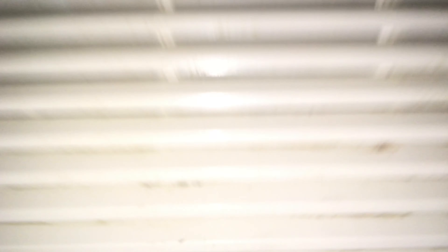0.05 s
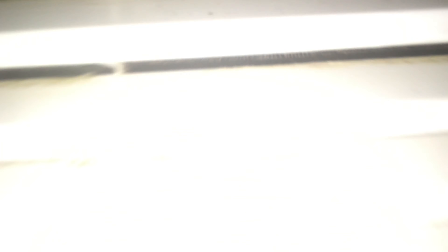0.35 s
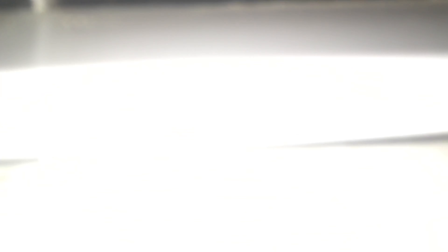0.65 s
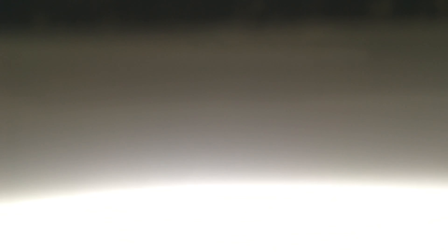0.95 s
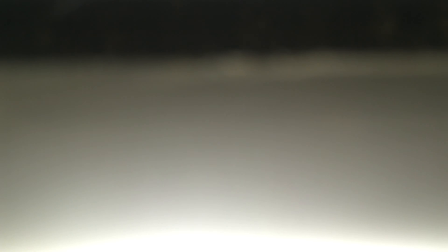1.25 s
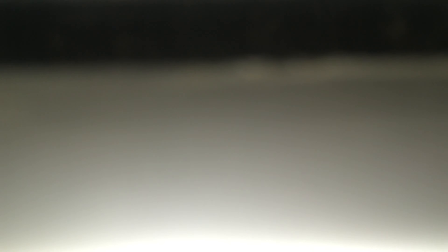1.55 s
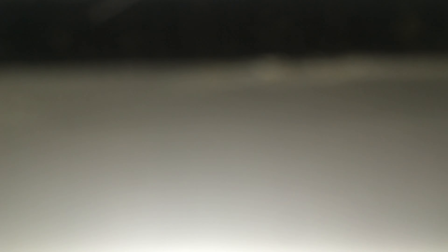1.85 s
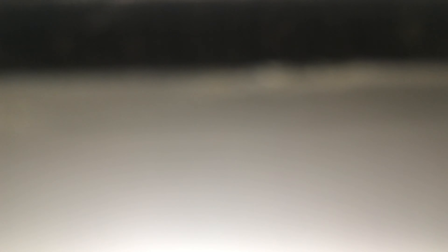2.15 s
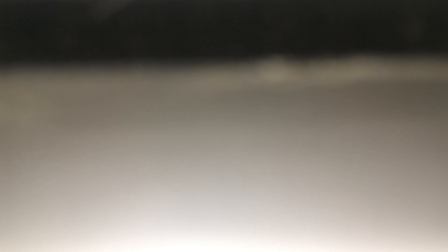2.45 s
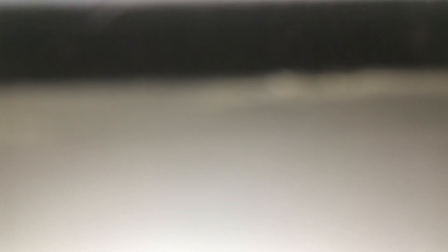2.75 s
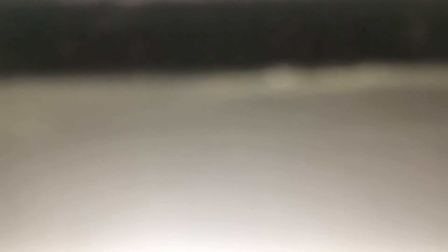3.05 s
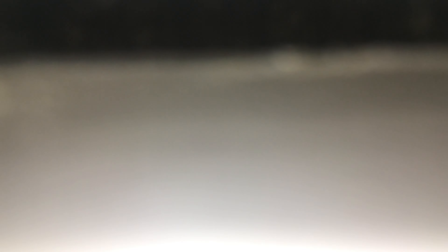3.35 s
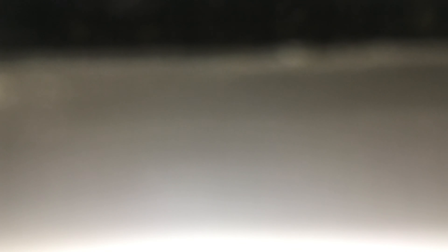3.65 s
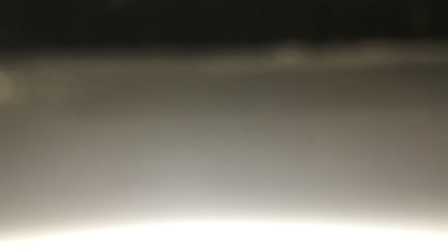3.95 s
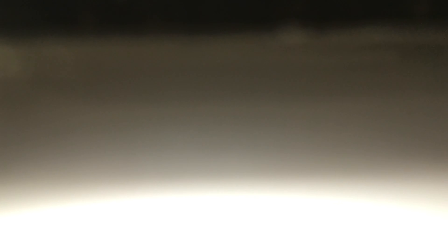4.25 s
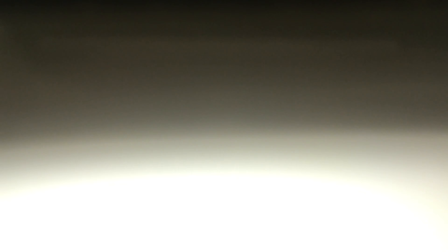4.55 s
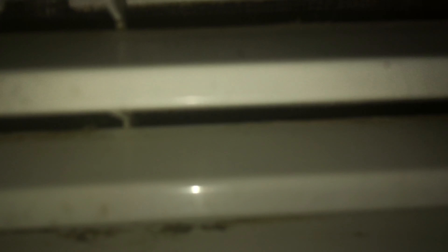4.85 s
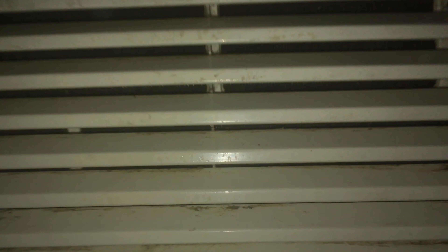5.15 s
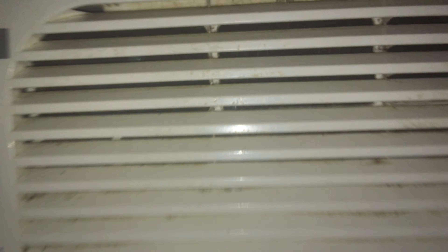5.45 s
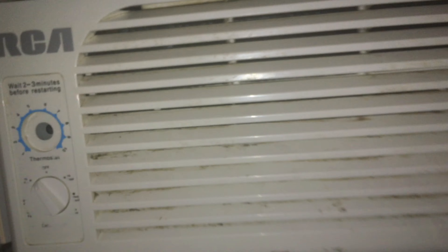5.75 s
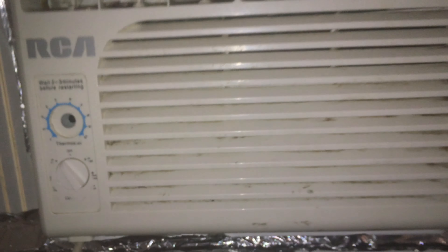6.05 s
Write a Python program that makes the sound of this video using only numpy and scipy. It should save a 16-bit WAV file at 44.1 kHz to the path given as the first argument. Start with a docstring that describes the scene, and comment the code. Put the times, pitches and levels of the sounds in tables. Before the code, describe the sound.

A window air conditioner rushes and hums while its air stream buffets the microphone with a gusting rumble, soft thumps and dull pops.

```python
"""A window air conditioner runs in a room: its compressor buzzes under the rush of the blower.
The microphone starts beside the vent, catches one gust, and after a second moves into the air stream.
There eddies buffet its port with a lumpy rumble, soft thumps and dull pops.
Near the end it backs away, crosses the edge of the jet once more and leaves it."""
import sys
import numpy as np
from scipy import signal
from scipy.fft import rfft, irfft
from scipy.io import wavfile
from scipy.ndimage import uniform_filter1d

SR = 44100
rng = np.random.default_rng(int(sys.argv[2]) if len(sys.argv) > 2 else 0)


def dump(signal):
    """Clip the signal to [-1, 1] and save it as 16-bit WAV at the path in sys.argv[1]."""
    limited = np.clip(np.atleast_2d(signal).T, -1, 1)
    pcm = np.round(limited * 32767).astype(np.int16)
    wavfile.write(sys.argv[1], SR, pcm)


N = 268569


def from_db(db):
    """Decibels to gain."""
    return 10 ** (np.asarray(db) / 20)


def unit_rms(x):
    """Scale to an rms of 1."""
    return x / np.sqrt(np.mean(x ** 2) + 1e-20)


def automation(rows):
    """Breakpoints to one curve for each column after the time."""
    times, *columns = np.transpose(rows)
    return [np.interp(np.arange(N) / SR, times, column) for column in columns]


def drift(rate_hz):
    """Smooth random wandering with an rms of 1."""
    hz = np.arange(N // 2 + 1) * SR / N
    return unit_rms(irfft(rfft(rng.standard_normal(N)) / (1 + (hz / rate_hz) ** 2), N))


def equalise(x, eq):
    """Shape x with an EQ curve that falls 21 dB an octave past both ends; rms 1."""
    hz, db = np.transpose(eq)
    octave, points = np.log2(np.arange(1, N // 2 + 2) * SR / N), np.log2(hz)
    outside = np.abs(octave - np.clip(octave, points[0], points[-1]))
    gain = from_db(np.interp(octave, points, db) - 21 * outside)
    return unit_rms(irfft(rfft(x) * gain, N))


# The microphone's move past the vent: time_s, front_share (0-1), cabinet_echo_ms
MIC_PATH = [(0, 0, 0.83), (.35, 0.07, 0.77), (.84, 0.06, 0.65), (.97, 0.94, 0.71), (4.68, 1, 0.74),
            (4.82, 0.13, .7), (5.4, 0, 0.82), (6.09, 0, 1.4)]


def in_front():
    """Where the microphone is: 0 beside the vent, 1 in front of it."""
    return np.clip(automation(MIC_PATH)[0], 0, 1)


def harmonics(turns, partials, waver_db):
    """Sines on multiples of the shaft rate, each wavering in level on its own."""
    return sum(from_db(db + waver_db * drift(1.6)) * np.sin(2 * np.pi * (round(k) * turns + rng.random()))
               for k, db in partials)


# The compressor's hum at the usual distance: shaft_multiple, level_db
HUM_TONES = [(1, -42), (2, -37.5), (4, -36), (12, -49), (17, -49), (18, -48), (19, -42.5), (24, -54),
             (32, -51.5), (34, -58)]
# Resonances of its shell, which colour the buzz: centre_hz, width_hz, level_db
SHELL_RESONANCES = [(2983, 219.3, -61), (4313, 57, -63), (5300, 150, -65.5), (6190, 600, -71),
                    (9300, 300, -76)]
SHAFT_HZ = 57.61


def compressor(turns, fader_db):
    """The strokes hum through the cabinet and buzz in the shell's resonances, louder close to the vent."""
    buzz = []
    for hz, width, db in SHELL_RESONANCES:
        for k in range(int((hz - width) / SHAFT_HZ), int((hz + width) / SHAFT_HZ) + 2):
            detune = 2 * (k * SHAFT_HZ - hz) / width
            buzz.append((k, db - 10 * np.log10(1 + detune ** 2)))
    nearness = from_db(fader_db - np.median(fader_db))
    return nearness * (harmonics(turns, HUM_TONES, waver_db=2.0) + harmonics(turns, buzz, waver_db=3.0))


# Fine, airy top from the lip of the vent: freq_hz, gain_db
SIZZLE_EQ = [(8500, -8), (9400, -5), (10400, -14), (11200, -1), (13000, 0), (14300, -7), (15600, -20)]


def lip_sizzle(fader_db, usual_db=-57, falloff=2.6):
    """Air tearing off the lip of the vent sizzles; it carries only a short way, and only to the side."""
    level_db = usual_db + falloff * (fader_db - np.median(fader_db))
    return from_db(level_db) * np.sqrt(1 - in_front()) * equalise(rng.standard_normal(N), SIZZLE_EQ)


# Fader ride on the blower as the microphone moves: time_s, gain_db
BLOWER_FADER = [(0, -48.5), (.36, -42), (.78, -40), (1.8, -39.5), (3.3, -39.5), (4.63, -39), (5.0, -43),
                (5.41, -44.5), (5.66, -49.3), (6.09, -49)]
# Body of the duct's rush, in front of the vent and beside it: freq_hz, gain_db
RUSH_FRONT_EQ = [(25, -23), (55, 1), (110, 5), (230, 5.5), (370, 3.5), (500, -9.5), (700, -3.5), (850, -5),
                 (1200, -5.5), (1450, -11), (1750, -12), (2000, -11), (2450, -16.5), (2900, -17),
                 (3600, -28.5)]
RUSH_ASIDE_EQ = [(25, -25), (55, -2.5), (110, -1.5), (240, 4.5), (370, 2), (500, -7), (700, -2.5),
                 (830, -5), (1100, -4), (1350, -7.5), (1650, -9), (2050, -14.5), (2650, -14), (3700, -26.5)]
# Bright louvre hiss from the same two positions: freq_hz, gain_db
HISS_FRONT_EQ = [(2400, -18), (3400, -1.5), (4100, 3), (4330, 6.5), (4550, 0), (4960, -4.5), (5250, 0.3),
                 (6400, -2), (7800, -7.5), (9200, -7.5), (10400, -12), (12300, -10.5), (13200, -8),
                 (15600, -21)]
HISS_ASIDE_EQ = [(2400, -20), (3400, 2.5), (4300, 0.5), (4950, -5), (5400, 0.5), (6300, 1), (7800, -6.5),
                 (9300, -5), (10400, -10), (11200, -5), (12200, -9), (12900, -6), (14300, -12),
                 (15600, -16)]


def blower(turns, fader_db, rush_db=11.5, hiss_db=-6.5, throb=0.058, echo=0.19):
    """Air rushes through the duct and hisses at the louvres; the hiss throbs with each compressor stroke."""
    front, aside = np.sqrt(in_front()), np.sqrt(1 - in_front())
    rush_front, hiss_front, rush_aside, hiss_aside = rng.standard_normal((4, N))
    # beside the vent the cabinet's echo combs the hiss, and the comb glides as the microphone moves
    now, lag_ms = np.arange(N), automation(MIC_PATH)[1]
    combed = hiss_aside + echo * np.interp(now - lag_ms * SR / 1000, now, hiss_aside)
    rush = front * equalise(rush_front, RUSH_FRONT_EQ) + aside * equalise(rush_aside, RUSH_ASIDE_EQ)
    hiss = front * equalise(hiss_front, HISS_FRONT_EQ) + aside * equalise(combed, HISS_ASIDE_EQ)
    strokes = 1 + throb * np.cos(2 * np.pi * turns)
    return from_db(fader_db) * (from_db(rush_db) * rush + from_db(hiss_db) * hiss * strokes)


def turbulence(eq, lumpy_db, lump_hz, steady_s):
    """Pressure that comes in quick lumps, while its mean power over steady_s stays level."""
    lumps = equalise(rng.standard_normal(N) * from_db(lumpy_db * drift(lump_hz)), eq)
    return lumps / np.sqrt(uniform_filter1d(lumps ** 2, int(steady_s * SR)) + 1e-6)


# Large eddies, each a soft thump of wind: peak_s, level_db, length_s
GUST_CUES = [(0.046, -15.5, 0.066), (0.732, -21.5, 0.019), (.888, -18, 0.018), (.942, -17, 0.025),
             (1.025, -16.5, 0.04), (1.095, -17.5, 0.028), (1.152, -14, 0.028), (1.232, -16.5, 0.031),
             (1.374, -12, 0.029), (1.869, -16.5, .035), (2.107, -19, 0.024), (2.598, -16.5, .03),
             (2.854, -22.5, 0.031), (2.954, -15, .03), (3.39, -15.5, .08), (3.64, -19, 0.026),
             (3.76, -17, 0.027), (4.123, -15, 0.024), (4.196, -17, 0.033), (4.615, -20, .06),
             (4.73, -14, 0.027), (4.83, -19.5, 0.033), (4.965, -24, 0.047), (5.439, -21, .024),
             (5.487, -14, 0.016), (5.544, -15.5, 0.031), (5.618, -9.5, 0.018), (5.725, -19, 0.052),
             (5.796, -19.5, .03), (5.901, -17, 0.043)]


def gust_envelope(rise_share=0.39):
    """Each large eddy swells quickly and fades more slowly; the powers add."""
    t, power = np.arange(N) / SR, 0
    for peak_s, db, length_s in GUST_CUES:
        half_power_s = length_s * np.where(t < peak_s, rise_share, 1 - rise_share)
        away = np.abs(t - peak_s) / half_power_s
        power = power + from_db(db) ** 2 * .5 ** np.minimum(away, 10) ** 2
    return np.sqrt(power)


# Bed of wind on the port as the microphone enters and leaves the jet: time_s, level_db
WIND_BED = [(0, -34), (.15, -43), (.33, -31.5), (.85, -29.5), (1.0, -26), (1.3, -26.5), (1.5, -23),
            (2.0, -21), (2.38, -23), (2.6, -21), (3.2, -23.5), (3.45, -21.5), (4.05, -23), (4.7, -24),
            (5.2, -36.5), (5.38, -43), (5.55, -27.5), (6.0, -50)]
# Deep rumble of large eddies and low-mid flutter of small ones: freq_hz, gain_db
RUMBLE_EQ = [(20, -35), (30, -16), (40, -5.5), (55, 0), (80, 0.4), (120, -4.5), (200, -9), (300, -18.5),
             (500, -28), (900, -43)]
FLUTTER_EQ = [(80, -34), (150, 1), (250, 1.5), (370, 1), (480, -6), (620, -8), (850, -17.5), (1200, -20.5),
              (1450, -28), (2500, -48)]


def buffeting(swell_db=2.5, swell_hz=15, flutter_aside_db=-7.5, flutter_front_db=-3, gust_flutter_db=-12.5):
    """Large eddies rumble on the port; they break into small ones, which flutter most in the jet's core."""
    stream = from_db(automation(WIND_BED)[0] + swell_db * drift(swell_hz))
    gust = gust_envelope()
    breakup = from_db(flutter_aside_db + (flutter_front_db - flutter_aside_db) * in_front())
    flutter_level = np.hypot(breakup * stream, from_db(gust_flutter_db) * gust)
    rumble = np.hypot(stream, gust) * turbulence(RUMBLE_EQ, lumpy_db=3.0, lump_hz=15.5, steady_s=0.0423)
    flutter = flutter_level * turbulence(FLUTTER_EQ, lumpy_db=5.5, lump_hz=102, steady_s=.05)
    return from_db(-.5) * rumble + from_db(0.16) * flutter


def lesser_eddies(per_s=5, above_bed_db=2.5, spread_db=2, centre_hz=480, spread_octaves=0.26):
    """Cues for weaker pops, which come at random in the core of the jet and follow the wind's level."""
    softness, pitch = rng.standard_normal((2, N))
    hits = np.flatnonzero(rng.random(N) < per_s * in_front() / SR)
    peak_db = automation(WIND_BED)[0] + above_bed_db - spread_db * softness
    return [(i / SR, peak_db[i], centre_hz * 2 ** (spread_octaves * pitch[i])) for i in hits]


def with_trails(eddies, mean_gap_s=0.00603, loss_db=6.5):
    """Every eddy is followed by a weaker one, a few milliseconds behind."""
    gaps = mean_gap_s * (.5 + rng.random(len(eddies)))
    return eddies + [(s + gap, db - loss_db, hz) for (s, db, hz), gap in zip(eddies, gaps)]


# The featured pops, small eddies striking the port: peak_s, peak_db, pitch_hz
POP_CUES = [(.039, -14, 394), (1.083, -11, 523), (1.446, -11, 300), (1.599, -19, 510), (1.7055, -13.5, 620),
            (1.906, -15, 444), (1.934, -12, 440), (2.157, -4.5, 583), (2.28, -9, 510), (2.479, -8.5, 227),
            (2.709, -3.5, 470), (2.839, -13.5, 750), (3.02, -7, 610), (3.241, -14, 530), (3.269, -8.5, 320),
            (3.33, -10, 400), (3.392, -2.5, 470), (3.726, -14, 497), (3.826, -8, 517), (4.381, -9.5, 400),
            (4.428, -9.5, 450), (4.483, -11.5, 397), (4.724, -14.5, 480), (5.511, -12, 544),
            (5.607, -10.5, 454), (5.615, -8.5, 220), (5.907, -16.5, 520)]


def eddy_pops(band_ratio=1.74, port_hz=1220):
    """An eddy that hits the port squarely gives one sharp swing of pressure, slower for a larger eddy."""
    pops, kick = np.zeros(N), signal.unit_impulse(SR // 10)
    port = signal.butter(6, port_hz, fs=SR, output="sos")   # eddies smaller than the port average out
    for peak_s, peak_db, hz in with_trails(POP_CUES + lesser_eddies()):
        band = signal.butter(2, [hz / band_ratio, hz * band_ratio], "band", fs=SR, output="sos")
        swing = signal.sosfilt(np.vstack([band, port]), kick)
        attack_samples = np.argmax(np.abs(signal.hilbert(swing)))
        start = max(int(peak_s * SR) - attack_samples, 0)
        pop = from_db(peak_db) * swing / np.abs(swing).max()
        pops[start:start + len(pop)] += pop[:N - start]
    return pops


def scene():
    """The running unit and the wind on the port, in mono."""
    fader_db, = automation(BLOWER_FADER)
    turns = np.cumsum(SHAFT_HZ * (1 + .0003 * drift(3))) / SR   # of the compressor's shaft
    unit = blower(turns, fader_db) + lip_sizzle(fader_db) + compressor(turns, fader_db)
    return (unit + buffeting() + eddy_pops())[None]


def record(dry):
    """The microphone loses the deepest bass, rounds the hardest swings and cuts the top."""
    bass_cut = signal.butter(2, 30, "high", fs=SR, output="sos")
    top_cut = signal.ellip(12, .1, 90, 15700, fs=SR, output="sos")
    rounded = np.tanh(signal.sosfilt(bass_cut, dry))
    return signal.sosfilt(top_cut, rounded)


dry = scene()
out = record(dry)
dump(out)
```